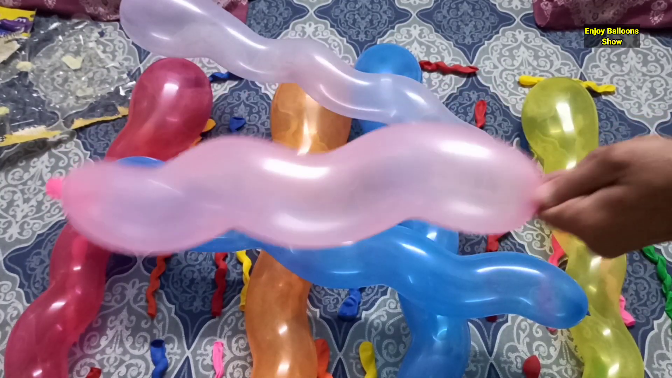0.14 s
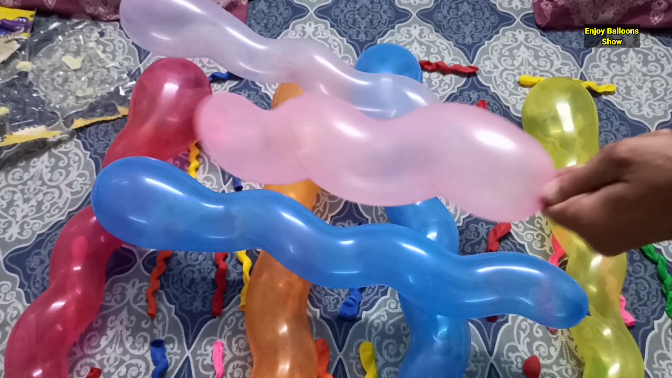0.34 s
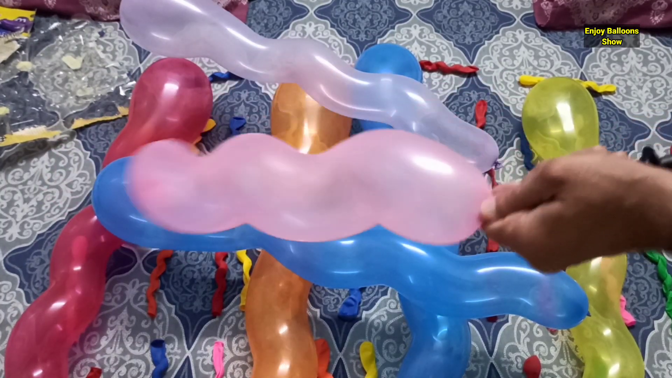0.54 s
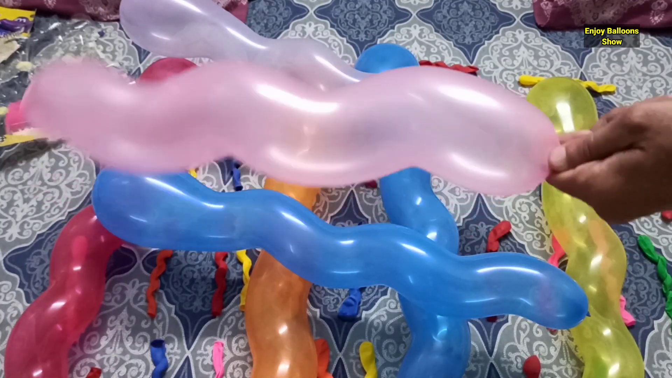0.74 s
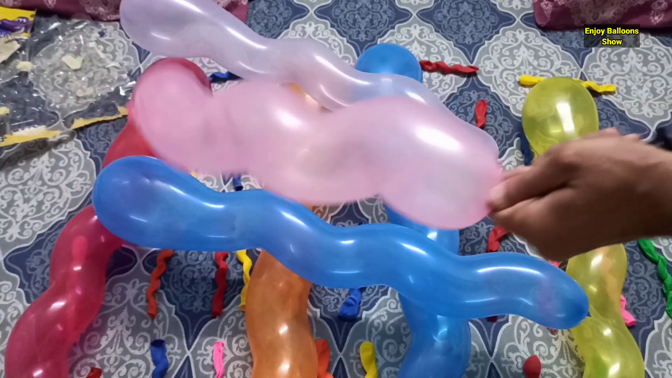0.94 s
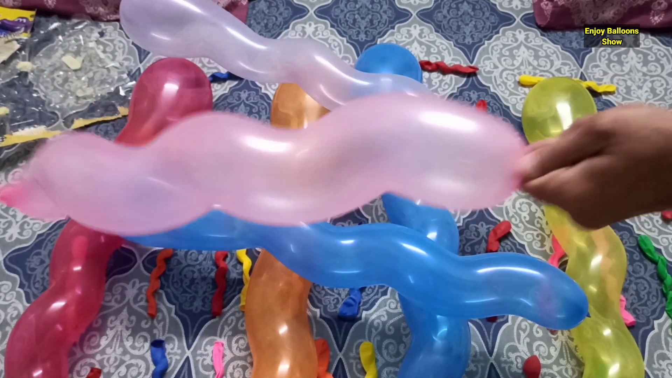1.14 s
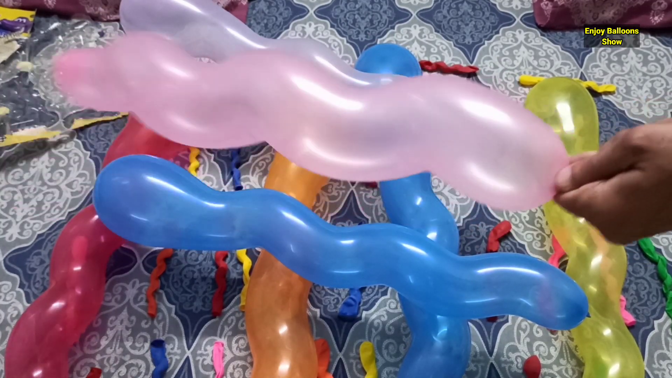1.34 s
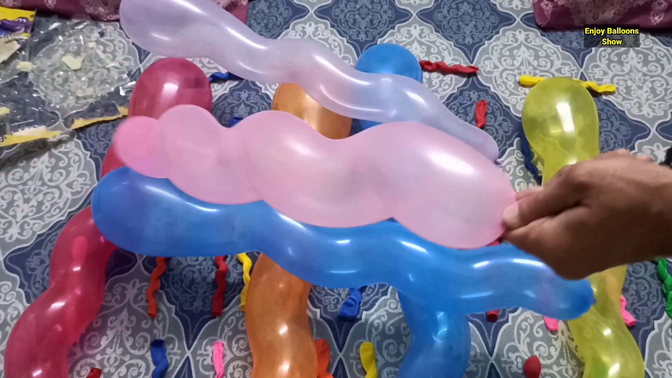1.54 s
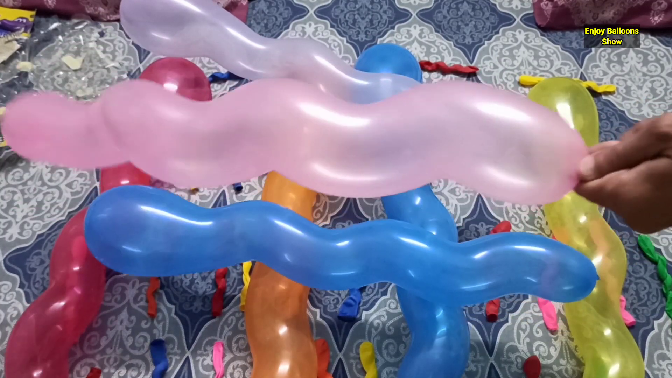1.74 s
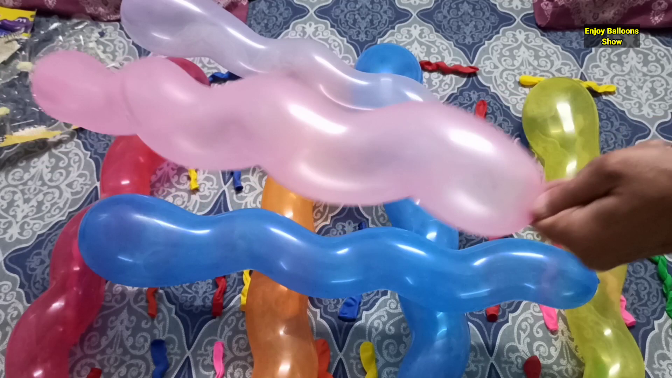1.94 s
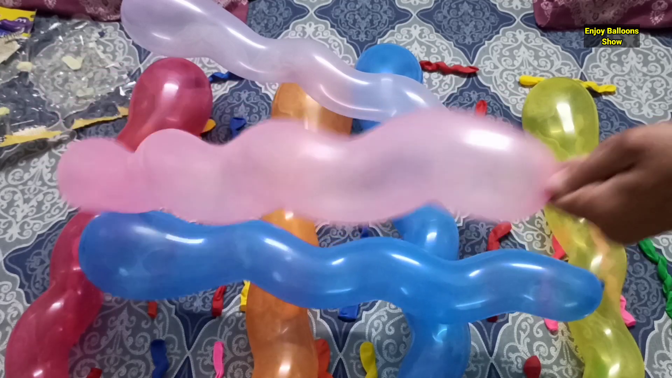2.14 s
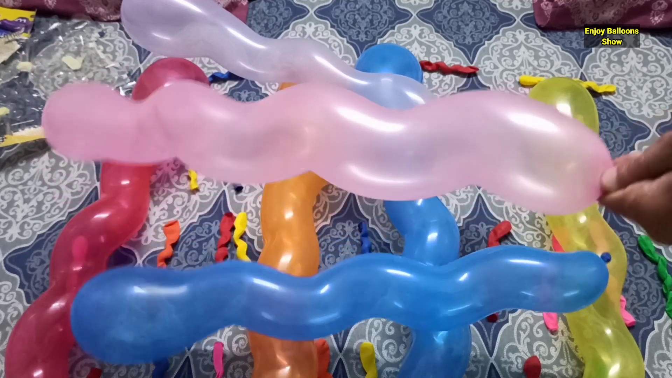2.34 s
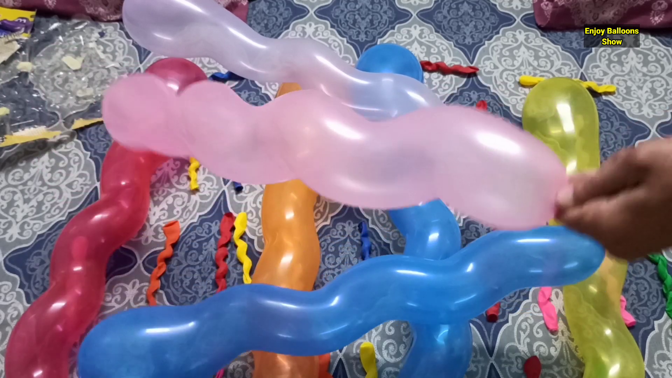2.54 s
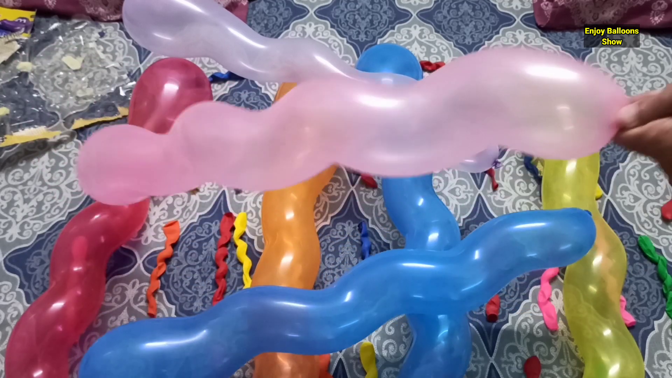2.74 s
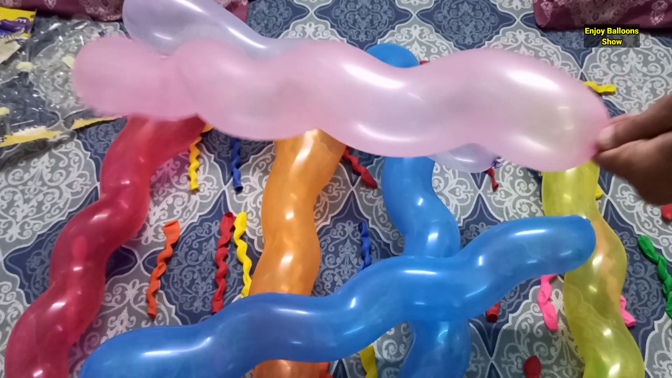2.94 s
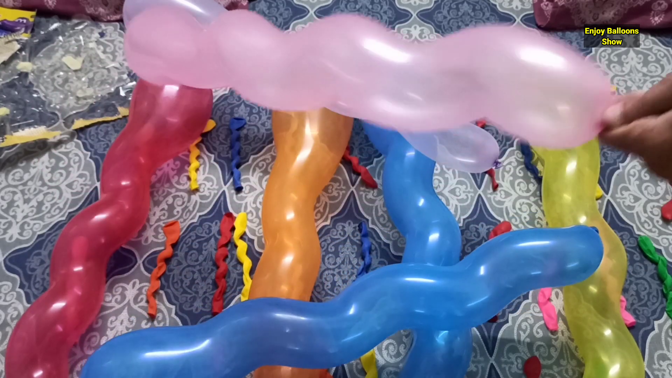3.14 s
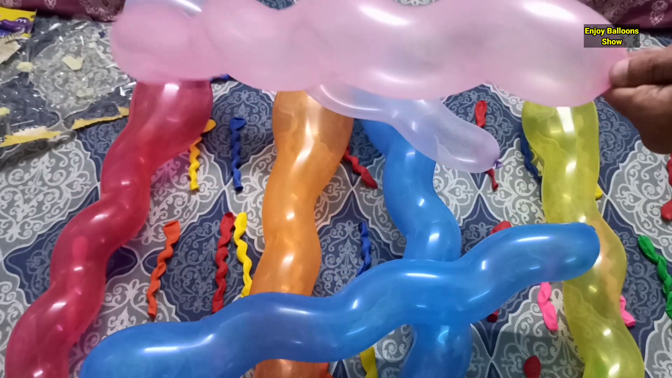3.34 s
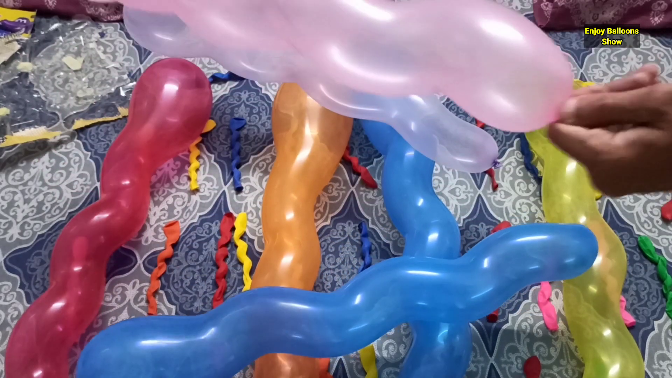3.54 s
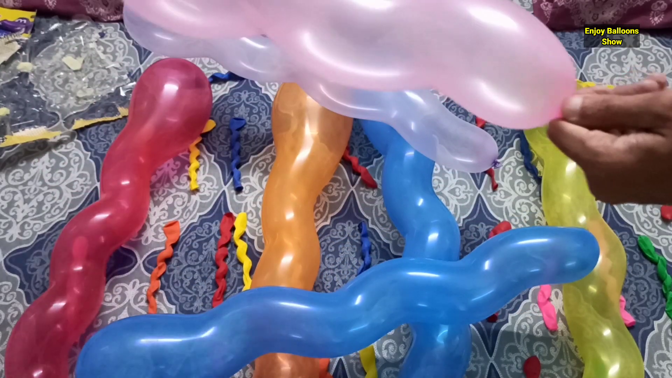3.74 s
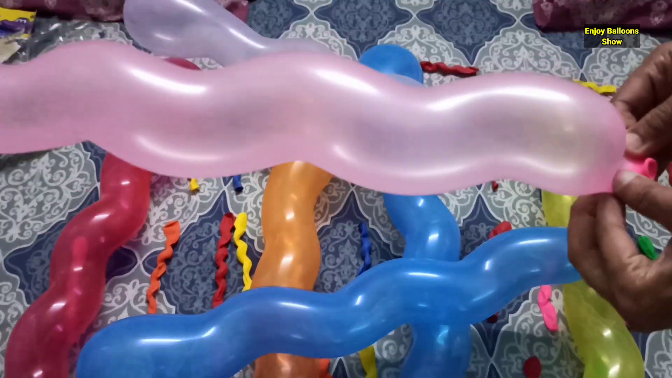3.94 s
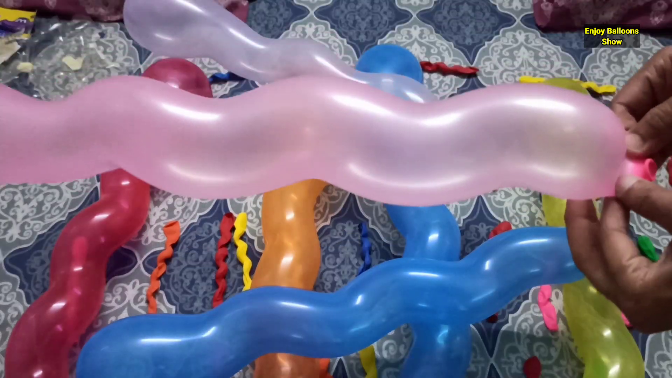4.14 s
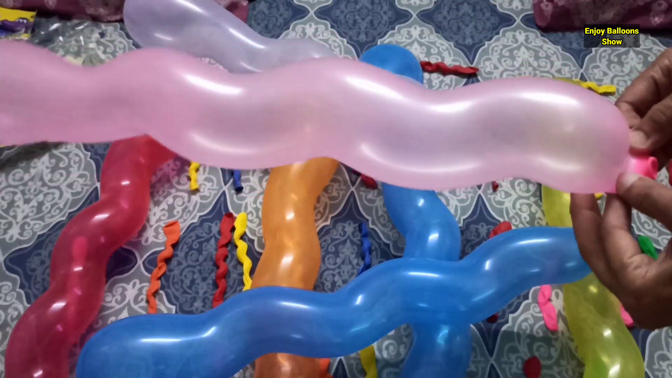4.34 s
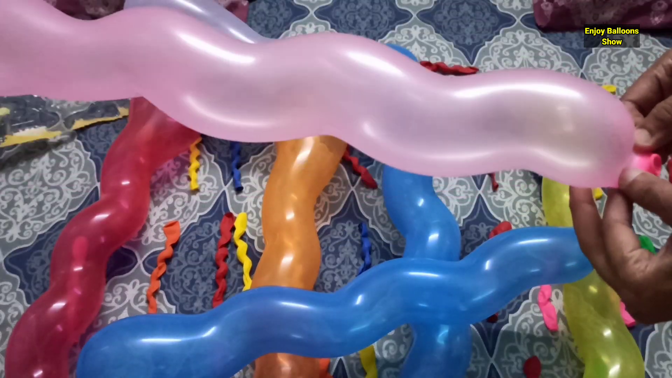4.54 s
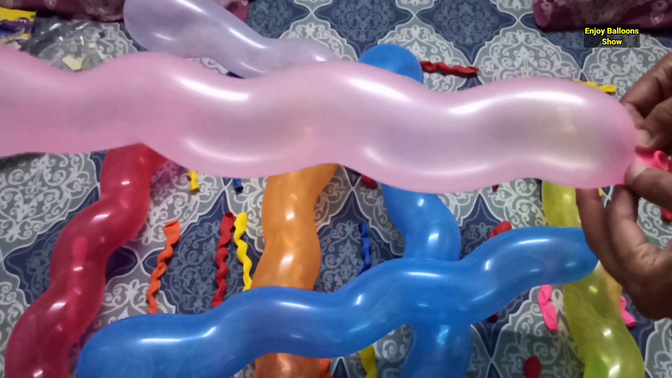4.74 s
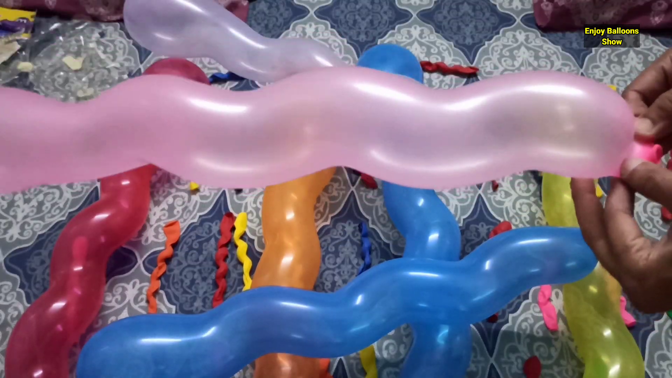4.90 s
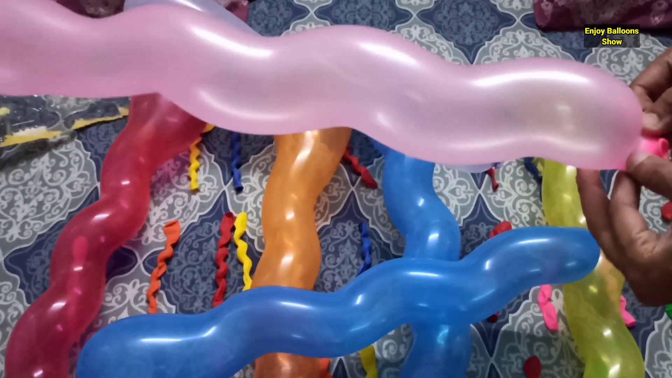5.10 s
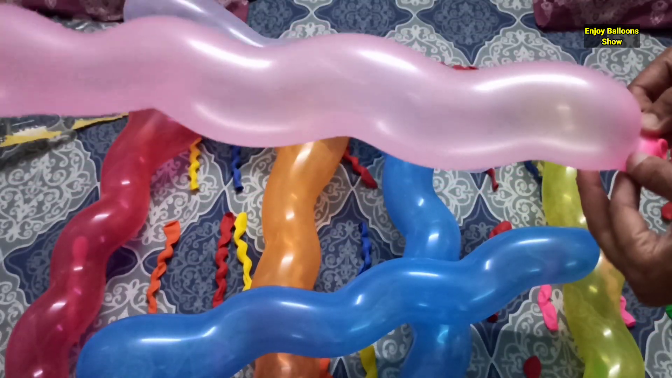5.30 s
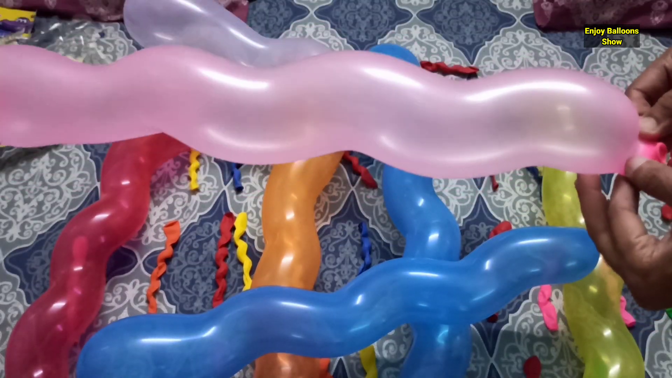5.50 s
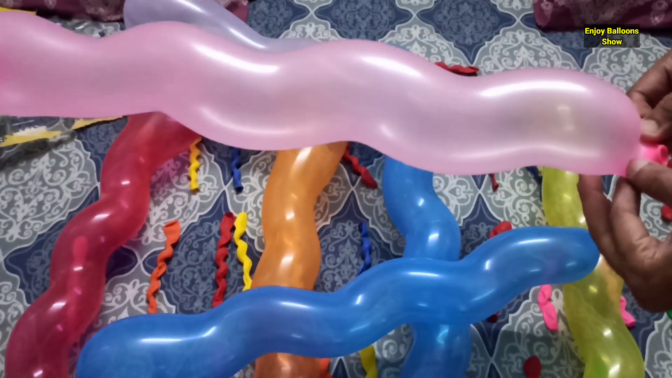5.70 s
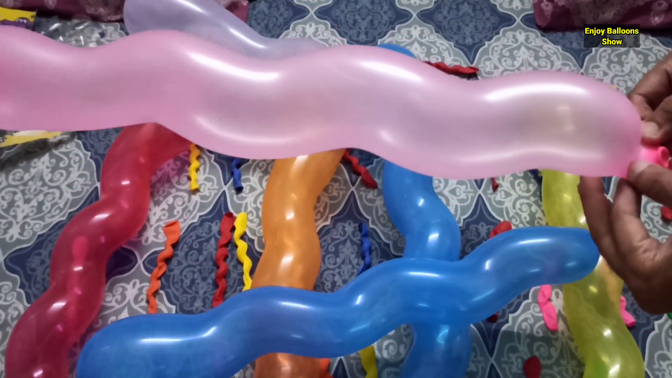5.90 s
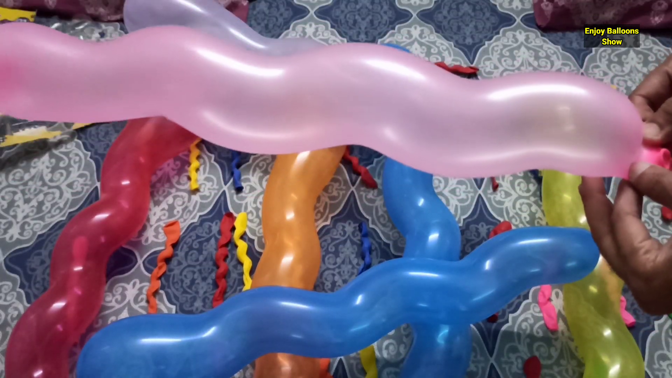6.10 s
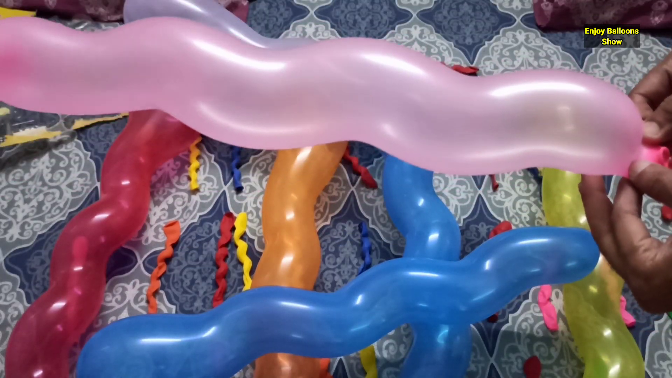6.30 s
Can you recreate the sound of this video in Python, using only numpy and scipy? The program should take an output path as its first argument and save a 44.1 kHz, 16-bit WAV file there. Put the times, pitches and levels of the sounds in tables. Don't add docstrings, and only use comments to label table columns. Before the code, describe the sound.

A hand pump knocks, hisses and whistles in quick strokes, then a rubber squeak, a pop, and a long loud rough wavering balloon squeal.

```python
import sys
import numpy as np
from scipy import signal
from scipy.fft import rfft, irfft
from scipy.io import wavfile
from scipy.ndimage import uniform_filter1d

SR = 44100
rng = np.random.default_rng(int(sys.argv[2]) if len(sys.argv) > 2 else 0)


def voltage_ratio(decibels):
    exponent = np.asarray(decibels, float) / 20
    return 10 ** exponent


def generate_wav(signal):
    frames = np.transpose(np.atleast_2d(signal))
    scaled = np.clip(frames, -1, 1) * 32767
    pcm = np.round(scaled).astype(np.int16)
    wavfile.write(sys.argv[1], SR, pcm)


N = 280476
T = np.arange(N) / SR

# (time [s], flow level [dB], jet share [dB])
LIP_FLOW = [(3.92, -45.5, -6), (3.972, -24, -19), (4.034, -19, -4.5), (4.12, -28.5, -5.5), (4.142, -30, -1),
            (4.146, -13, -10), (4.21, -18.5, -4), (4.3, -18, -6), (4.65, -18.5, -4), (4.792, -14.5, -11),
            (4.9, -18.5, -5.5), (5.02, -18, -5.5), (5.13, -20, -3), (6.36, -20.5, -2.5)]
# (time [s], roughness [0-1])
LIP_SLACK = [(3.91, .6), (4.138, 1), (4.146, .2), (4.6, .35), (4.95, .64), (6.36, .6)]
# (tightest time [s], pitch rise [Hz], tightening [s], relaxing [s])
LIP_TUGS = [
    (4.03, 55, .04, .06),
    (4.138, 235, .25, .003),
    (4.144, 260, .002, .012),
    (4.146, 470, .003, .072),
    (4.28, 38, .08, .14),
    (4.55, 22, .04, .04),
    (4.779, 730, .055, .046),
    (5.05, 62, .07, .14),
    (6.22, 36, .4, .1),
]
# (frequency [Hz], level [dB])
LIP_SPECTRUM = [(900, -9.5), (1500, -6.5), (2200, -10), (2700, -6.5), (3200, -6.5), (3800, -4),
                (4300, -10.5), (5000, -10), (5500, -7.5), (6600, -1.5), (7500, -0.5), (8500, -8),
                (12000, -6.5), (15500, -11.5)]
# (frequency [Hz], level [dB])
JET_SPECTRUM = [(200, -18), (1300, -26), (1700, -18), (2700, -15.5), (3250, -10), (3600, -11.5),
                (4300, -6.5), (4900, -15.5), (5400, -18), (6500, -0.5), (8400, -6.5), (12000, -12.5),
                (15500, -19)]
SLACK_HZ, TUG_POWER, CLEANING_HZ, TIGHT_ROUGH = 1047, 1.4, 300, 0.06
JITTER, WANDER = 0.021, 0.015
LOW_BEADING, HIGH_BLUR = 0.28, 0.1
SLACK_THIRD_DB = -14.5
TIGHT_TILT_DB_PER_OCTAVE = 2.5
RESTART_S, RESTART_THIN_DB, RESTART_FILL_S = 4.146, -8, 0.08

# (time [s], pitch [Hz], level [dB])
NECK_SQUEAK = [
    (3.36, 2460, -69),
    (3.385, 2590, -45.5),
    (3.44, 2578, -45.5),
    (3.492, 2503, -41.5),
]
# (multiple of pitch, level [dB])
SQUEAK_PARTIALS = [(1, 10), (2, -5), (3, -6), (4, -3), (5, -13), (6, -4)]
# (frequency [Hz], level [dB])
PUFF_SPECTRUM = [(200, -10), (1500, -6.5), (4000, 1), (5200, -7), (7000, 6.5), (8500, 2), (13000, -5.5),
                 (15500, 3)]
LEAK_SPECTRUM = [(2000, -33), (6000, 3), (10000, 14), (15500, 1)]   # (frequency [Hz], level [dB])
SQUEAK_ROUGH = 0.45
POP_S, POP_DB, POP_ATTACK_S, POP_HOLD_S = 3.489, -24.5, 0.005, 0.03
POP_TAIL_DB, POP_TAIL_S = -36.5, 0.034
LEAK_S, LEAK_DB, LEAK_RISE_S, LEAK_FALL_S = 3.71, -52.5, 0.03, 0.14

# (push start [s], push length [s], push level [dB], following pull level [dB])
PUMP_STROKES = [
    (-0.352, 0.19, -40, -49.5),
    (0.135, 0.18, -39.5, -49),
    (0.646, 0.185, -40.5, -50),
    (1.143, 0.185, -40.5, -50.5),
    (1.661, 0.16, -40, -49),
    (2.149, 0.2, -39.5, -51),
    (2.67, 0.17, -40, -55.5),
    (3.155, 0.1, -41.5, -51),
]
# (time [s], level [dB])
PISTON_TURNS = [(0.108, -51), (0.35, -50), (0.62, -44), (0.849, -44.5), (1.107, -50.5), (1.346, -47),
                (1.65, -54), (1.856, -44.5), (2.121, -47), (2.365, -51), (2.619, -45.5), (2.878, -48),
                (3.118, -52.5), (3.313, -47), (3.423, -52)]
# (frequency [Hz], level [dB])
HISS_SPECTRUM = [(300, 0.5), (1000, -5.5), (2500, -6), (4000, -0.5), (5100, -7.5), (6500, 0.5),
                 (8500, -2.5), (12000, 3.5), (15500, -0.5)]
# (loudest time [s], pitch there [Hz], level [dB], valve-opening chirp [dB])
NOZZLE_WHISTLES = [
    (0.258, 8380, -28, -37),
    (0.772, 8150, -28, -36),
    (1.253, 8370, -26.5, -34.5),
    (1.774, 8150, -31, -39.5),
    (2.267, 8300, -28, -41.5),
    (2.765, 8430, -26.5, -34.5),
    (3.236, 8460, -44, -33.5),
]
PUSH_ATTACK_S, PUSH_SAG_DB, PUSH_SAG_POWER = 0.027, 24, 4.86
PULL_AFTER_S, PULL_RISE_S, PULL_FALL_S = 0.33, 0.071, 0.11
TURN_S = 0.0061
PUSH_BRIGHT_DB, PULL_BRIGHT_DB, TURN_BRIGHT_DB = -5, -5, -4.5
PUSH_EDGE_DB = 3.5
CHIRP_HZ, CHIRP_AFTER_S, CHIRP_RISE_S, CHIRP_FALL_S = 8400, 0.034, 0.018, 0.056
WHISTLE_SAG_HZ_PER_S, SWELL_S, DIE_S = 22000, 0.032, 0.0059

# (time [s], peak level [dB], barrel pitch [Hz], barrel ring [dB])
PISTON_KNOCKS = [
    (0.103, -22, 387, -56),
    (0.428, -37, 264, -1.5),
    (0.616, -20.5, 289, -20),
    (0.838, -39, 203, -30),
    (0.929, -38.5, 255, -3),
    (1.11, -36.5, 224.4, -11),
    (2.12, -18, 411, -25),
    (2.166, -30, 273, -24),
    (2.618, -28.5, 277, -15),
    (3.129, -38, 323, -32),
]
# (time [s], peak level [dB])
VALVE_TICKS = [
    (0.1496, -38),
    (0.666, -27.5),
    (1.1723, -29),
    (1.6897, -31),
    (2.163, -35),
    (2.6733, -30),
    (3.1628, -34),
    (3.385, -36),
    (3.461, -28.5),
]
TICK_ATTACK_S = 0.0015

# (frequency [Hz], level [dB])
FLOOR_SPECTRUM = [(24, -65), (40, -12), (114, -7), (188, -8.5), (235, -4), (359, -12), (427, -11.5),
                  (522, -15), (686, -16), (1350, -26), (1770, -25), (2840, -26), (5860, -32.5), (8310, -35),
                  (15500, -42.5)]
# (frequency [Hz], likeness [0-1])
FLOOR_LIKENESS = [(30, .2), (60, 0.9), (150, 0.98), (300, 0.93), (700, 0.38), (1400, 0.015)]
# (start [s], length [s], pitch [Hz], level [dB])
HORN_BLASTS = [
    (1.415, 0.15, 325.5, -55),
    (1.7, 0.2, 327.5, -56),
]
# (multiple of pitch, level [dB])
HORN_PARTIALS = [(1, 7), (4, -4), (10, 6.5), (11, 0)]
ROOM_DB, HUM_HZ, HUM_DB, HUM_ROUGH, HUM_FLUTTER_HZ = -44, 118.5, -46.5, 0.6, 6.5
DUCK_S, DUCK_RAMP_S, ROOM_DUCK_DB, HUM_DUCK_DB = 4, 0.26, -7, -13
HORN_ATTACK_S, HORN_RELEASE_S, HORN_EDGE_DB = 0.025, 0.07, -12
ROOM_T60_S = 0.34

# (frequency [Hz], gain [dB])
PORT_GAIN = [(45, -24), (75, 0), (8600, 0), (9400, -6), (9900, -10), (11450, -11), (11600, 0), (15450, 0),
             (15700, -60)]
# (frequency [Hz], width [Hz], gain [dB])
PORT_CAVITIES = [(6750, 200, 3), (7500, 200, 3), (8460, 120, 5)]
# (frequency [Hz], threshold [dB])
MASK_THRESHOLD = [(2150, -40), (2400, -12), (3000, -6), (3500, -6), (3800, -11), (4200, -20), (4900, -9.5),
                  (5400, -13), (6000, -18), (8700, -20), (9150, -7), (11400, -7), (11800, -24)]


def in_time(rows, fade_s=0.0036):
    s, *columns = np.transpose(rows)
    if s[0] > 0:
        gate = np.clip(np.minimum(T - s[0], s[-1] + fade_s - T) / fade_s, 0, 1)
    else:
        gate = 1.0 * (T <= s[-1])
    return [gate] + [np.interp(T, s, c) for c in columns]


def swell(s, rise_s, fall_s, power=2):
    return np.exp(-np.abs((T - s) / np.where(T < s, rise_s, fall_s)) ** power)


def at_hz(points, hz):
    points_hz, values = np.array(points).T
    return np.interp(np.log(np.maximum(hz, 1)), np.log(points_hz), values)


def colour(x, points):
    return irfft(rfft(x) * voltage_ratio(at_hz(points, np.fft.rfftfreq(N, 1 / SR))), N)


def filtered(x, order, hz, kind):
    return signal.sosfilt(signal.butter(order, hz, kind, fs=SR, output="sos"), x)


def rms_one(x):
    return x / np.sqrt(np.mean(x ** 2))


def drift(rate_hz):
    r = np.exp(-2 * np.pi * rate_hz / SR)
    settle = 9000
    return rms_one(signal.lfilter([1], [1, -2 * r, r * r], rng.standard_normal(N + settle))[settle:])


def jet(points, patchy_db, alike):
    both, left, right = rng.standard_normal((3, N))
    noise = np.sqrt(alike) * both + np.sqrt(1 - alike) * np.array([left, right])
    air = colour(noise, points) * voltage_ratio(patchy_db * drift(20.3))
    return air / np.std(filtered(air[0], 4, [1000, 9000], "band"))


def partial(turns, rough, flutter_hz):
    rough = np.clip(rough, 0, 1)
    flutter = drift(flutter_hz) + 1j * drift(flutter_hz)
    shake = np.sqrt(1 - rough) + np.sqrt(rough / 2) * flutter
    return np.sqrt(2) * np.real(shake * np.exp(2j * np.pi * turns))


def tone(rows, orders, rough, flutter_hz):
    gate, hz, level_db = in_time(rows)
    turns = np.cumsum(hz) / SR
    partials = sum(voltage_ratio(db) * partial(round(k) * turns, rough, flutter_hz) for k, db in orders)
    return gate * voltage_ratio(level_db) * partials


def squeal():
    _, flow_db, jet_db = in_time(LIP_FLOW)
    gate, slack = in_time(LIP_SLACK, fade_s=0.0073)
    rise_hz = sum(hz * swell(s, tighten_s, relax_s, TUG_POWER) for s, hz, tighten_s, relax_s in LIP_TUGS)
    loose = np.exp(-rise_hz / CLEANING_HZ)
    hz = SLACK_HZ + rise_hz
    rough = TIGHT_ROUGH + (slack - TIGHT_ROUGH) * loose
    unsteady = JITTER * drift(60) + WANDER * drift(9)
    turns = np.cumsum(hz * (1 + rough * unsteady)) / SR
    lips = np.zeros(N)
    for k in range(1, 15):
        level_db = at_hz(LIP_SPECTRUM, k * hz)
        level_db += TIGHT_TILT_DB_PER_OCTAVE * (1 - loose) * np.clip(np.log2(k / 4), -1, 0.6)
        if k == 1:
            level_db += RESTART_THIN_DB * (T > RESTART_S) * swell(RESTART_S, RESTART_FILL_S, RESTART_FILL_S)
        if k == 3:
            level_db += SLACK_THIRD_DB * loose * (1 - slack) ** 2
        blur = rough + LOW_BEADING / k + HIGH_BLUR * max(k - 8, 0)
        lips += voltage_ratio(level_db) * (k * hz < 16000) * partial(k * turns, blur, flutter_hz=36 + 14 * k)
    puffs = 1 + 0.35 * np.cos(2 * np.pi * turns)
    air = voltage_ratio(jet_db + 5.4 * (rough - 0.4659)) * puffs * jet(JET_SPECTRUM, patchy_db=1.3, alike=0.37)
    return gate * voltage_ratio(flow_db) * (voltage_ratio(-7) * lips + air)


def pop():
    squeak = tone(NECK_SQUEAK, SQUEAK_PARTIALS, SQUEAK_ROUGH, flutter_hz=41.2)
    age = np.maximum(T - POP_S, 0)
    decay = voltage_ratio(POP_DB) * np.exp(-(age / POP_HOLD_S) ** 4) + voltage_ratio(POP_TAIL_DB) * np.exp(-age / POP_TAIL_S)
    puff = (1 - np.exp(-(age / POP_ATTACK_S) ** 2)) * decay
    leak = voltage_ratio(LEAK_DB) * swell(LEAK_S, LEAK_RISE_S, LEAK_FALL_S)
    return (squeak + puff * jet(PUFF_SPECTRUM, patchy_db=0.5, alike=0.37)
            + leak * jet(LEAK_SPECTRUM, patchy_db=1.0, alike=0.43))


def pump():
    push = np.zeros(N)
    for s, length_s, db, _ in PUMP_STROKES:
        age = np.maximum(T - s, 0)
        sag_db = PUSH_SAG_DB * (age / length_s) ** PUSH_SAG_POWER
        push += voltage_ratio(db - sag_db) * (1 - np.exp(-(age / PUSH_ATTACK_S) ** 2))
    pull = sum(voltage_ratio(db) * swell(s + PULL_AFTER_S, PULL_RISE_S, PULL_FALL_S) for s, _, _, db in PUMP_STROKES)
    turn = sum(voltage_ratio(db) * swell(s, TURN_S, TURN_S) for s, db in PISTON_TURNS)
    air = jet(HISS_SPECTRUM, patchy_db=2.0, alike=0.86)
    low = filtered(air, 6, 10500, "low")
    top = filtered(air, 6, 10500, "high")
    edge = filtered(air, 2, [8800, 9800], "band")
    bright = voltage_ratio(PUSH_BRIGHT_DB) * push + voltage_ratio(PULL_BRIGHT_DB) * pull + voltage_ratio(TURN_BRIGHT_DB) * turn
    hiss = (push + pull + turn) * low + bright * top + voltage_ratio(PUSH_EDGE_DB) * push * edge
    return voltage_ratio(4.0) * hiss + voltage_ratio(-2.5) * whistle()


def whistle():
    chirp, note = np.zeros(N), np.zeros(N)
    for (peak_s, _, note_db, chirp_db), (push_s, *_) in zip(NOZZLE_WHISTLES, PUMP_STROKES[1:]):
        chirp += voltage_ratio(chirp_db) * swell(push_s + CHIRP_AFTER_S, CHIRP_RISE_S, CHIRP_FALL_S)
        note += voltage_ratio(note_db) * swell(peak_s, SWELL_S, DIE_S, power=1.26)
    table = np.array(NOZZLE_WHISTLES)
    nearest = np.argmin(np.abs(T[:, None] - table[:, 0]), axis=1)
    peak_s, peak_hz = table[nearest, :2].T
    hz = peak_hz - WHISTLE_SAG_HZ_PER_S * np.clip(T - peak_s, -0.08, 0.01)
    return (chirp * partial(CHIRP_HZ * T, rough=0.9, flutter_hz=170)
            + note * partial(np.cumsum(hz) / SR, rough=0.8, flutter_hz=150))


def knocks():
    out = np.zeros(N)
    for s, peak_db, barrel_hz, ring_db in PISTON_KNOCKS:
        age = np.maximum(T - s - 0.0035, 0)
        push = 1 - np.exp(-(age / 0.0014) ** 2)
        thud = np.exp(-age / 0.0043) * np.sin(2 * np.pi * 390 * age - 1.1)
        thud += 0.66 * np.exp(-age / 0.0039) * np.sin(2 * np.pi * 270 * age)
        ring = voltage_ratio(ring_db) * np.exp(-age / 0.044) * np.sin(2 * np.pi * barrel_hz * age)
        out += voltage_ratio(peak_db + 3.0) * push * (thud + ring)
    return out


def ticks():
    shape = np.zeros(N)
    for s, db in VALVE_TICKS:
        age = T - s
        shape += voltage_ratio(db - 11.5) * np.clip(age / TICK_ATTACK_S, 0, 1) * np.exp(-np.abs(age) / 0.016)
    return shape * jet(JET_SPECTRUM, patchy_db=3.5, alike=0.53)


def horn():
    out = np.zeros(N)
    for s, length_s, hz, db in HORN_BLASTS:
        end_s, edge_db = s + length_s, db + HORN_EDGE_DB
        rows = [(s, hz, edge_db), (s + HORN_ATTACK_S, hz, db), (end_s - HORN_RELEASE_S, hz, db), (end_s, hz, edge_db)]
        out += tone(rows, HORN_PARTIALS, rough=0.3, flutter_hz=25)
    return out


def room_floor():
    ducked = np.clip((T - DUCK_S) / DUCK_RAMP_S, 0, 1)
    hz = np.fft.rfftfreq(N, 1 / SR)
    alike = np.clip(at_hz(FLOOR_LIKENESS, hz), 0, 1)
    mid, side = rfft(rng.standard_normal((2, N))) * voltage_ratio(at_hz(FLOOR_SPECTRUM, hz))
    noise = irfft(np.sqrt(1 + alike) * mid + np.sqrt(1 - alike) * side * [[1], [-1]], N)
    hum = voltage_ratio(HUM_DB + HUM_DUCK_DB * ducked) * partial(HUM_HZ * T, HUM_ROUGH, HUM_FLUTTER_HZ)
    return voltage_ratio(ROOM_DB + ROOM_DUCK_DB * ducked) * rms_one(noise) * voltage_ratio([[-0.7], [0.7]]) + hum + horn()


def heard(x, lag_s, pan_db, near_db, wet_db):
    x = x * np.ones((2, 1))
    age = np.arange(SR // 2) / SR
    near = voltage_ratio(near_db - 60 * age / 0.055) / np.sqrt(0.0025 * SR)
    walls = voltage_ratio(wet_db - 60 * age / ROOM_T60_S) / np.sqrt(0.0095 * SR)
    tail = rng.standard_normal((2, len(age))) * (near + walls) * np.clip(age / 0.002, 0, 1)
    late = np.exp(-2j * np.pi * np.fft.rfftfreq(N, 1 / SR) * lag_s)
    pan = voltage_ratio([[pan_db / 2], [-pan_db / 2]])
    direct = np.array([irfft(rfft(x[0]) * late, N), x[1]])
    return (direct + signal.fftconvolve(x, tail, axes=1)[:, :N]) * pan


def scene():
    return (heard(squeal(), lag_s=0.000453, pan_db=-0.5, near_db=-8.5, wet_db=-3.5)
            + heard(ticks() + pop(), lag_s=0.00014, pan_db=-1.0, near_db=-11.5, wet_db=-6.5)
            + heard(pump(), lag_s=0.000262, pan_db=-1.5, near_db=-8.5, wet_db=-6.0)
            + heard(knocks(), lag_s=0.00005, pan_db=-3.0, near_db=-39, wet_db=-11)
            + room_floor())


def masked(x):
    hz, s, bins = signal.stft(x, SR, nperseg=2048)
    power = np.sum(np.abs(bins[:, :1024]) ** 2, axis=0).reshape(128, 8, -1).mean(axis=1)
    relative_db = 10 * np.log10(power / power[6:90].mean(axis=0) + 1e-12)
    margin_db = relative_db - at_hz(MASK_THRESHOLD, hz[4:1024:8, None])
    whim = np.repeat(rng.standard_normal((64, len(s))), 2, axis=0)
    whim = np.repeat(whim, 3, axis=1)[:, :len(s)]
    keep = uniform_filter1d(margin_db, size=3, axis=1) + 3.5 * whim > 0
    bins[:, :1024] *= np.where(np.repeat(keep, 8, axis=0), 1, 0.003)
    return signal.istft(bins, SR, nperseg=2048)[1][:, :N]


def roll_off(x):
    return signal.sosfilt(signal.butter(12, 15810, fs=SR, output="sos"), x)


def record(dry):
    hz = np.fft.rfftfreq(N, 1 / SR)
    gain_db = at_hz(PORT_GAIN, hz)
    for peak_hz, width_hz, db in PORT_CAVITIES:
        gain_db += db / (1 + (2 * (hz - peak_hz) / width_hz) ** 2)
    limited = 0.9 * np.tanh(irfft(rfft(dry) * voltage_ratio(gain_db), N) / 0.9)
    return roll_off(masked(limited))


dry = scene()
out = record(dry)
generate_wav(out)
```